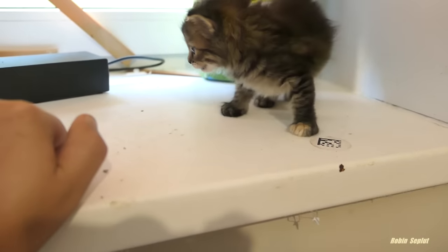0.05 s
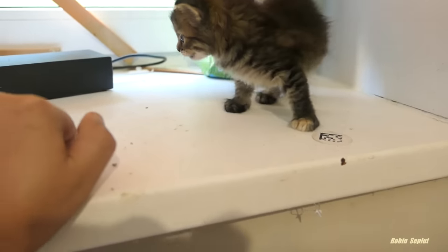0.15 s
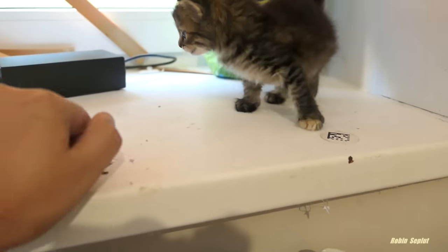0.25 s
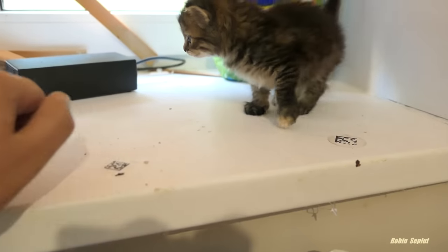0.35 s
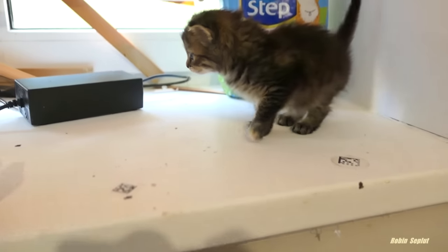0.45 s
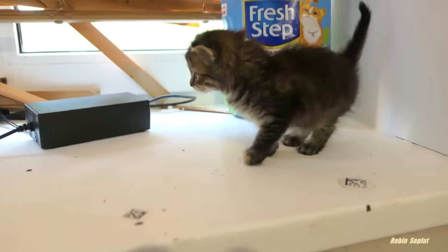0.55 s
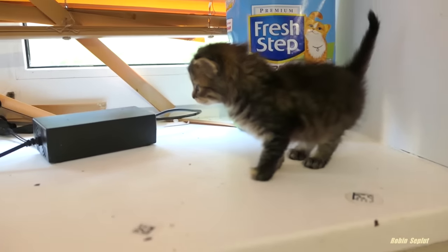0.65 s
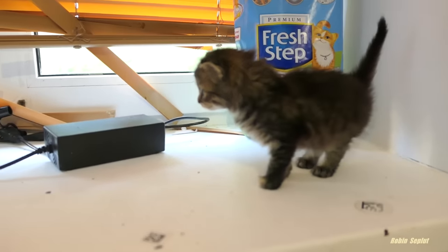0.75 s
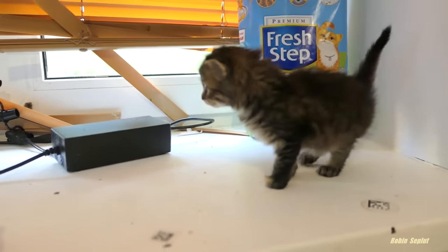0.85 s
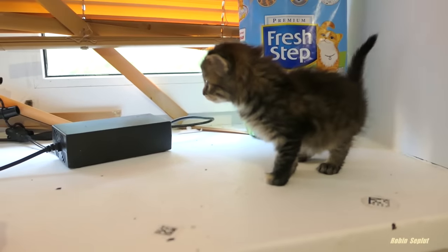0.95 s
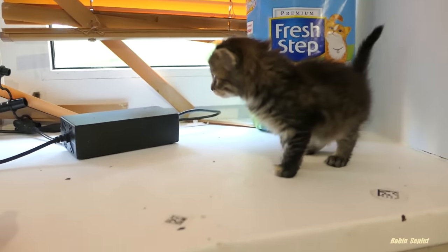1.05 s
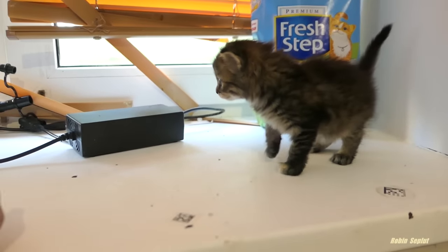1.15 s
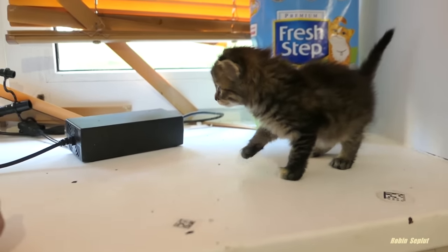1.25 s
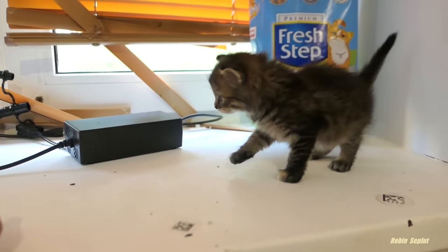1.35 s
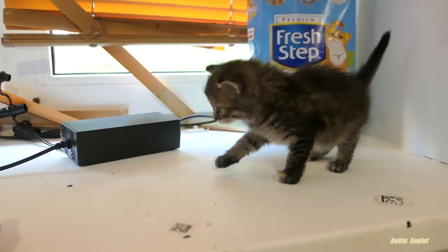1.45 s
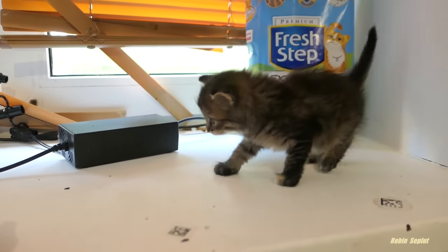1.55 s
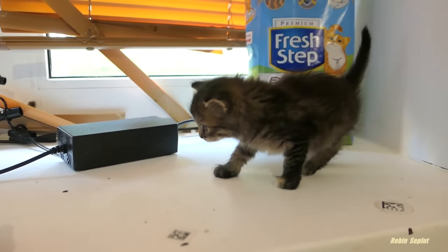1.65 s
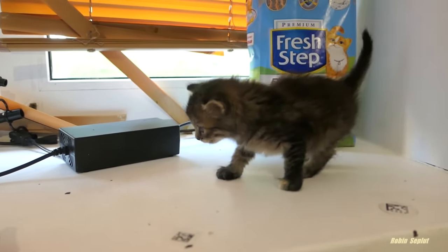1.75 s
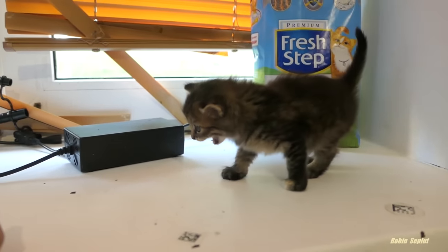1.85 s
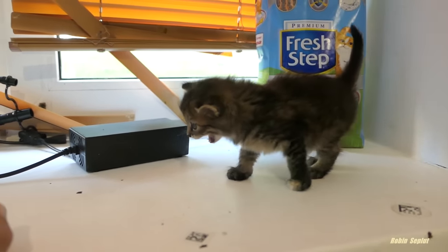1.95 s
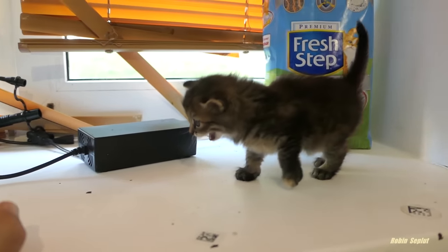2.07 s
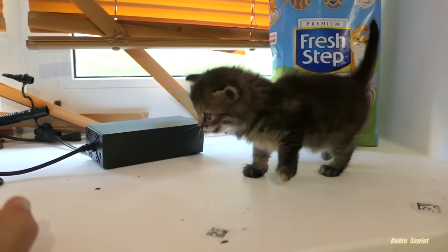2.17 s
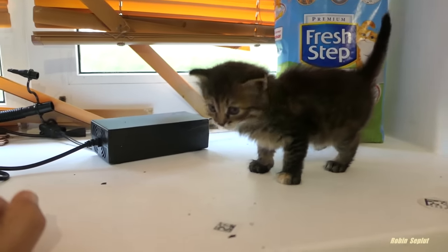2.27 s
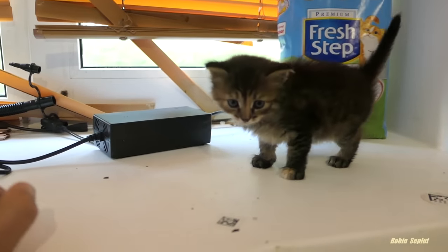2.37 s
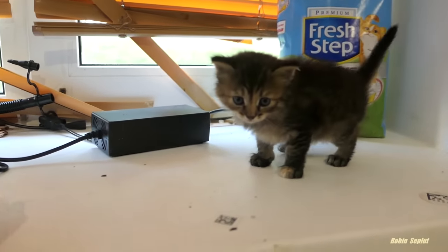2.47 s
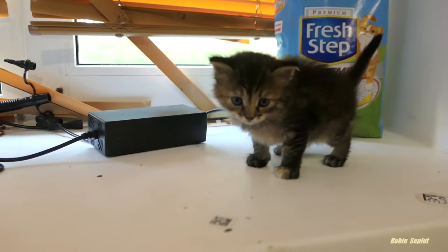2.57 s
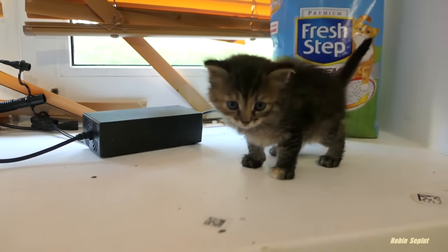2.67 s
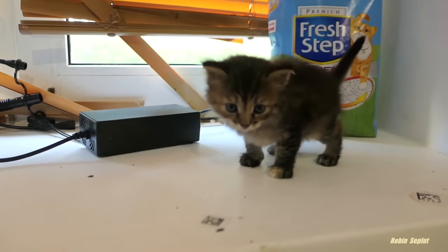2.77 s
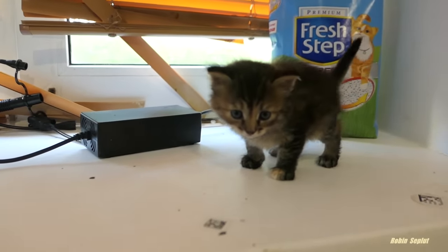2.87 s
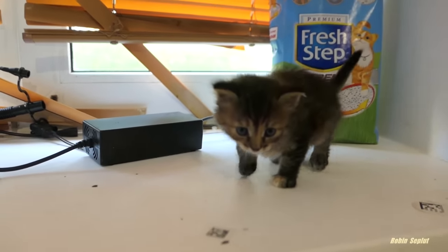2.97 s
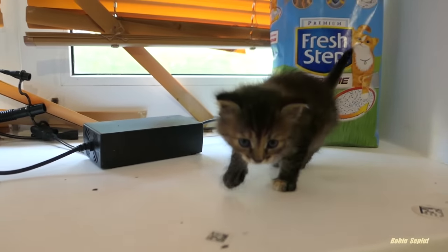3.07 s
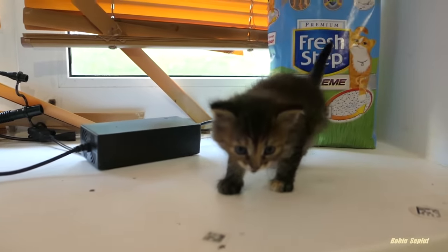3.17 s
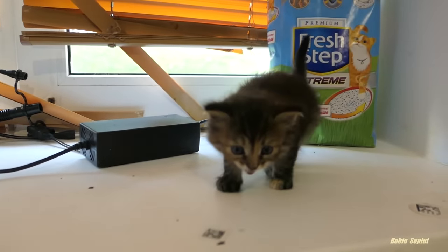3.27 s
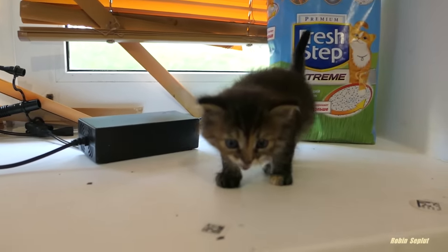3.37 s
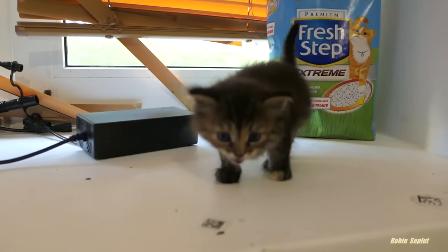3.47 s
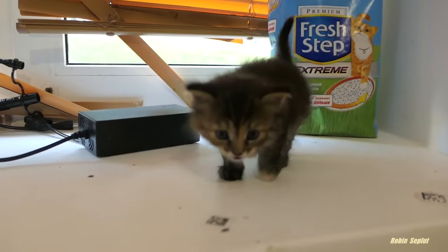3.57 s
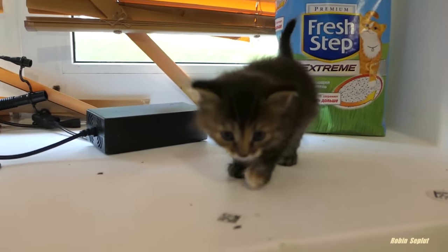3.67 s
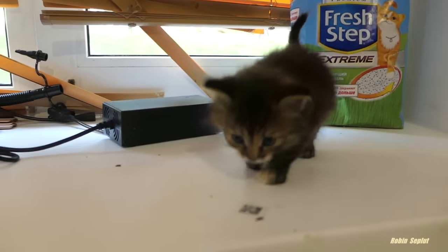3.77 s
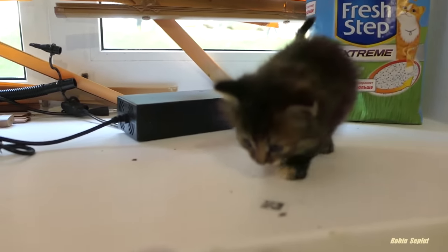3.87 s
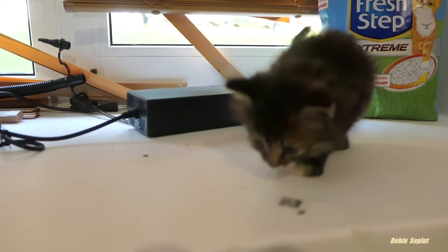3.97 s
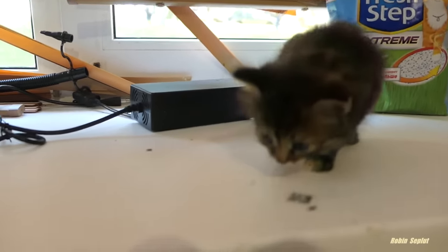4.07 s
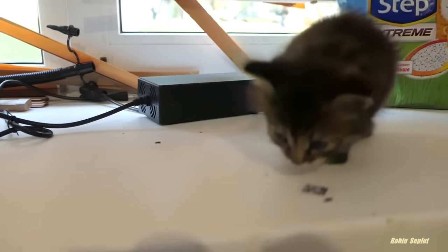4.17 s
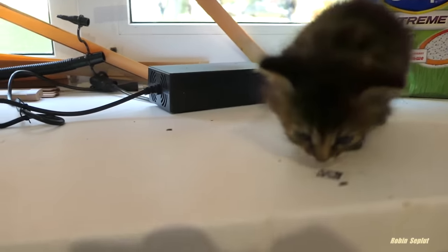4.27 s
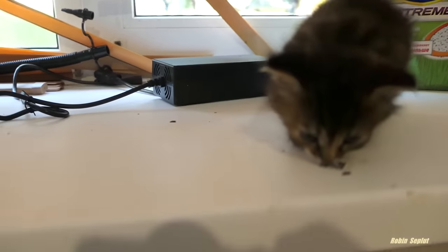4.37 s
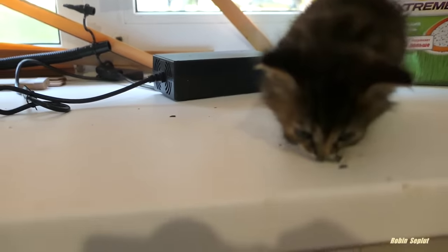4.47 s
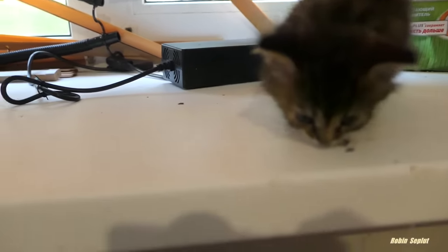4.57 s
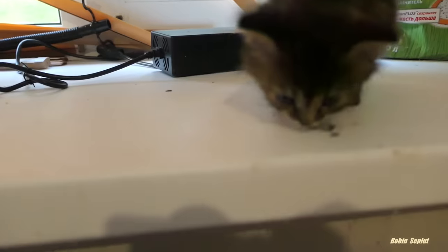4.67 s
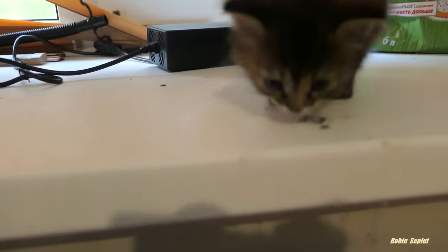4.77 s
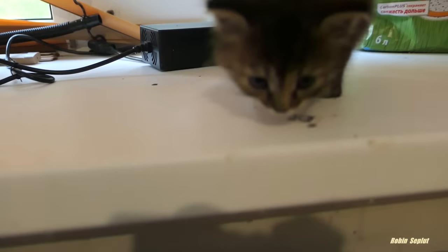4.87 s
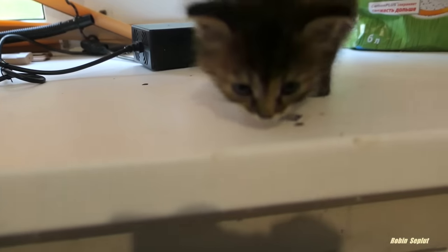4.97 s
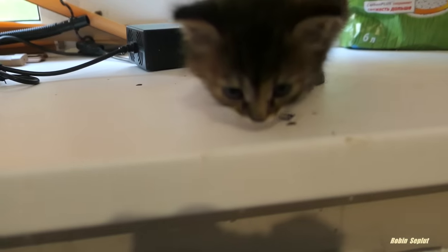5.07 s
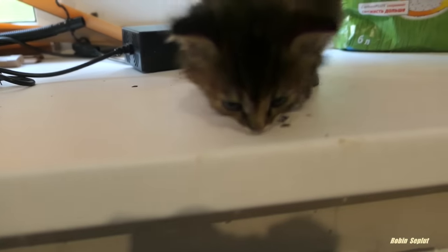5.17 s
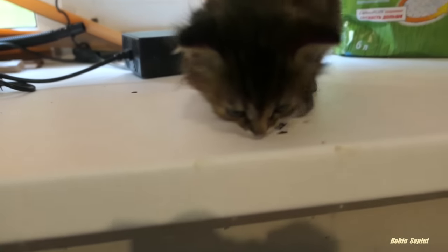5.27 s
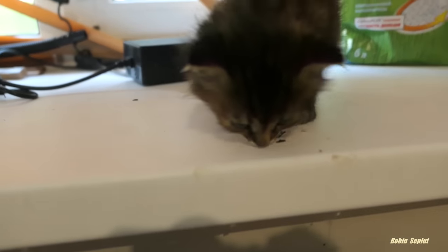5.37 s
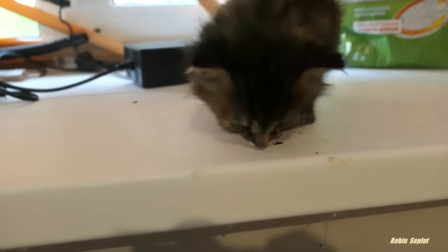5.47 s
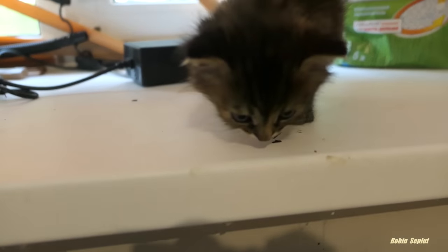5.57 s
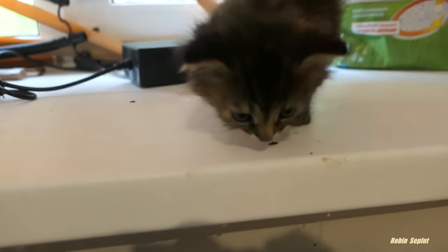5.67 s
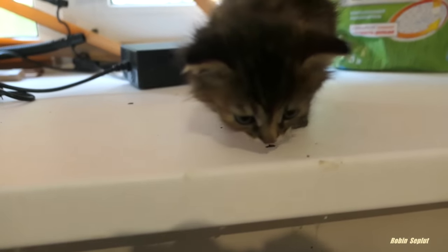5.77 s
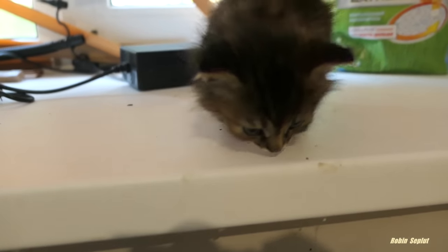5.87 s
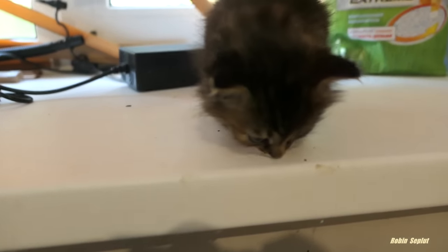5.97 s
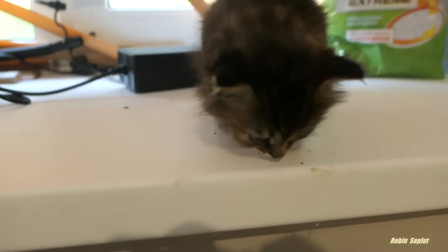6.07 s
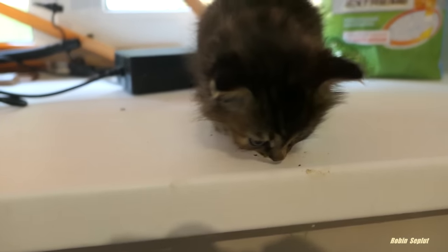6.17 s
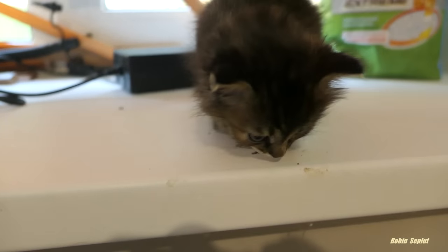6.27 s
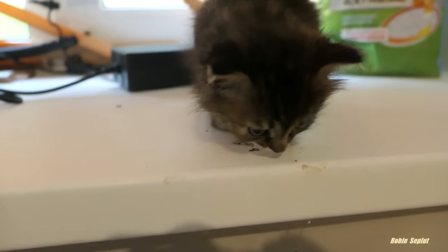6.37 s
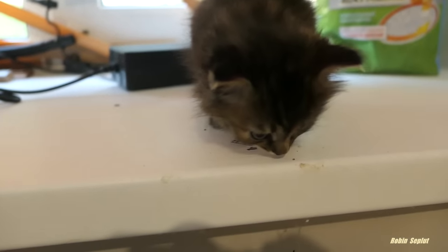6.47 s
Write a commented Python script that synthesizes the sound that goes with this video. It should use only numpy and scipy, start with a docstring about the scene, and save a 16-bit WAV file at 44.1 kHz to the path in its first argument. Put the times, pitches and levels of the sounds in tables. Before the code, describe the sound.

Something heavy and wooden slides briefly, then bangs loudly with a short rattle and a ringing echo. A young kitten close to the microphone follows with four thin, raspy, high mews, one just a tiny squeak. A softer wooden bump comes after the first mew. Paws and mouth add small ticks and scuffs over quiet room air, low hiss, a faint hum and a soft rustle.

```python
"""A young kitten on an indoor window sill gives four thin, raspy, high mews close by.
Its vocal folds buzz unevenly, and its tiny throat shapes that buzz and a hiss of breath into each mew.
Paws and mouth add small ticks and scuffs. Early on, something heavy and wooden slides and bangs with a
short rattle; later comes a softer bump. Behind it all are quiet room air, low microphone hiss, a faint
hum, a soft rustle and, near the end, a low rumble from handling the microphone."""
import sys
import numpy as np
from scipy import signal
from scipy.fft import rfft, irfft
from scipy.io import wavfile
from scipy.ndimage import uniform_filter1d

SR = 44100
rng = np.random.default_rng(int(sys.argv[2]) if len(sys.argv) > 2 else 0)


def output_pcm(signal):
    """Save a mono or channel-first signal as 16-bit PCM at the path in sys.argv[1].

    Samples are clipped to [-1, 1] before scaling.
    """
    pcm = np.clip(np.atleast_2d(signal).T, -1, 1) * 32767
    wavfile.write(sys.argv[1], SR, np.round(pcm).astype(np.int16))


N = 287734


def amp(db):
    """Turns decibels into a number to multiply a sound by."""
    return 10 ** (np.asarray(db) / 20)


def unit(x):
    """Scales a signal so that its average strength (rms) is 1."""
    return x / np.sqrt(np.mean(x ** 2) + 1e-20)


def read(points, hz):
    """Looks up a value between a table's rows, spacing frequencies by octaves."""
    row_hz, value = np.transpose(points)
    return np.interp(np.log(hz + 1), np.log(row_hz + 1), value)


def add(mix, start_s, sound):
    """Adds a sound to the mix at its start time."""
    part = mix[max(round(start_s * SR), 0):][:len(sound)]
    part += sound[:len(part)]


def bins(x):
    """Lists the frequencies in the spectrum of x."""
    return np.fft.rfftfreq(x.shape[-1], 1 / SR)


def colour(x, points):
    """Turns frequencies up or down by a table of frequency_hz, gain_db."""
    return irfft(rfft(x) * amp(read(points, bins(x))), x.shape[-1])


def band(x, hz, width_hz):
    """Keeps the sound near one pitch, as a resonance does, at strength 1."""
    return unit(irfft(rfft(x) / (1 + ((bins(x) - hz) / width_hz * 2) ** 2), x.shape[-1]))


def wobble(size, hz):
    """A random wavering of strength 1, mostly slower than hz."""
    noise = rng.standard_normal(size)
    return unit(irfft(rfft(noise) / (1 + (bins(noise) / hz) ** 2), size))


def swells(rows, rise_s):
    """A loudness curve of smooth humps, each with its own peak and fade."""
    t = np.arange(N) / SR
    power = np.zeros(N)
    for peak_s, level_db, fade_s in rows:
        width_s = np.where(t < peak_s, rise_s, fade_s)
        power += (amp(level_db) * np.exp(-((t - peak_s) / width_s) ** 2 / 2)) ** 2
    return np.sqrt(power)


def sharp_pulse(points, size=4096):
    """The most sudden pulse that has the given tone colour, with energy 1."""
    log_gain = np.log(amp(read(points, abs(np.fft.fftfreq(size, 1 / SR)))))
    pulse = np.fft.ifft(np.exp(np.conj(signal.hilbert(log_gain)))).real
    return pulse / np.linalg.norm(pulse)


def pan(left_db):
    """Two gains that make the left side louder than the right by left_db."""
    return amp([[left_db / 2], [-left_db / 2]])


def pair(x, likeness):
    """Makes two unrelated noises partly alike, as two nearby microphones hear a room."""
    first, second = rfft(x)
    alike = np.clip(read(likeness, bins(x)), 0, 1)
    shared = np.sqrt((1 + alike) / 2) * first
    opposite = np.sqrt((1 - alike) / 2) * second
    return irfft(np.array([shared + opposite, shared - opposite]), x.shape[-1])


# How long the room's echo takes to fade by 60 dB: frequency_hz, fade_s
ECHO_FADE = [(150, 0.62), (500, 0.67), (1500, 0.76), (3500, 0.69), (6000, 0.7445), (10000, 0.38),
             (15000, 0.42)]
# The tone colour of that echo: frequency_hz, gain_db
ECHO_COLOUR = [(150, 5.5), (1000, -1.5), (2200, 3), (3300, -5.5), (4500, 2), (6000, -4), (9000, -2),
               (15000, -5.5)]
# How alike it is on the left and right: frequency_hz, likeness_0_to_1
ECHO_LIKENESS = [(100, 1), (400, 0.94), (1000, 0.78), (3000, 0.83), (10000, 0.9)]

def room(x, gap_s):
    """After a short gap, the walls return a wash of echoes; each frequency fades at its own speed."""
    noise = pair(rng.standard_normal((2, SR)), ECHO_LIKENESS)
    hz, t, spectrum = signal.stft(noise, SR, nperseg=512)
    gain_db = read(ECHO_COLOUR, hz)[:, None] - 60 * t / read(ECHO_FADE, hz)[:, None]
    tail = signal.istft(spectrum * amp(gain_db), SR, nperseg=512)[1]
    tail *= np.clip(np.arange(tail.shape[1]) / SR / gap_s - 1, 0, 1)
    return signal.fftconvolve(x[None], tail / np.linalg.norm(tail[0]), axes=1)[:, :N]


# The tone colour of the room's quiet air: frequency_hz, gain_db
ROOM_AIR = [(25, -35), (60, -11.5), (105, -11), (135, -2.5), (230, 1), (420, -4.5), (560, -6), (710, -18),
            (1000, -16), (1300, -14), (2300, -18), (4600, -22.5), (5400, -16.5), (10000, -19.5),
            (15500, -27.5)]
# The tone colour of the microphone's own hiss: frequency_hz, gain_db
MICROPHONE_HISS = [(15, -57), (25, -29), (64, -13.5), (193, 1), (433, -1.5), (631, -4), (722, -7),
                   (804, -5.5), (919, -7), (1800, -15), (2700, -26.5), (15500, -36.5)]
# Humming bands of noise: pitch_hz, width_hz, level_db
HUM_BANDS = [(170, 43, -78.5), (494, 12, -79), (622, 60, -70.5), (814, 75, -64)]

def steady_noise(air_db=-62.5, hiss_db=-53):
    """Wide, low microphone hiss, opposite on the two sides, over quiet room air and a hum to the left."""
    air_noise, hiss_noise, hum_noise = rng.standard_normal((3, N))
    air = amp(air_db) * unit(colour(air_noise, ROOM_AIR))
    hiss = amp(hiss_db) * unit(colour(hiss_noise, MICROPHONE_HISS)) * np.array([[1], [-1]])
    hum = sum(amp(db) * band(hum_noise, hz, width_hz) for hz, width_hz, db in HUM_BANDS)
    return pan(0.26) * air + hiss + pan(14.1) * hum


# The tone colour of the rustle: frequency_hz, gain_db
RUSTLE_TONE = [(100, -17), (300, -6), (500, 7), (800, -9.5), (1300, 8), (1600, -2.5), (1850, -0.5),
               (2300, -17), (6000, -21), (15000, -33)]
# When it swells: peak_s, level_db, fade_s
RUSTLE_SWELLS = [(0.03, -59, 0.2), (0.31, -60, 0.092), (1.07, -55.5, 0.13), (1.85, -58.5, 0.8),
                 (2.27, -58.5, 0.21), (3.3, -59.5, 0.59), (3.75, -60, 0.26), (4.28, -56, 0.23),
                 (6.32, -58, 0.2)]

def rustle(rest_db=-65.5, flicker_db=3.14, waver_db=1.4):
    """A soft rustle swells now and then, while small patches of its tone flicker."""
    noise = colour(rng.standard_normal(N), RUSTLE_TONE)
    spectrum = signal.stft(noise, SR, nperseg=512)[2]
    patches = uniform_filter1d(rng.standard_normal(spectrum.shape), size=3, axis=0)  # blur in pitch
    patches = unit(uniform_filter1d(patches, size=7, axis=1))  # blur in time
    flickering = unit(signal.istft(spectrum * amp(flicker_db * patches), SR, nperseg=512)[1][:N])
    level = np.hypot(amp(rest_db), swells(RUSTLE_SWELLS, rise_s=0.11))
    level *= amp(waver_db * wobble(N, 21))
    return pan(3.9) * level * flickering


# The swell of the handling rumble: peak_s, level_db, fade_s
RUMBLE_SWELL = [(5.85, -66, 0.43)]

def handling_rumble(rest_db=-81):
    """A soft, low rumble grows as a hand moves the microphone closer."""
    level = np.hypot(amp(rest_db), swells(RUMBLE_SWELL, rise_s=0.67))
    return level * band(rng.standard_normal(N), hz=147, width_hz=51)


# The two slips of the sliding wood: peak_s, level_db, fade_s
WOOD_SLIPS = [(0.345, -53.5, 0.016), (0.392, -53.5, 0.033)]

def wood_slide(room_db=-13.5):
    """Rubbing makes heavy wood groan at one low pitch."""
    rub = band(rng.standard_normal(N), hz=299, width_hz=48)
    stick_slip = unit(np.tanh(2 * rub))  # sticking and slipping evens the swing and adds overtones
    groan = swells(WOOD_SLIPS, rise_s=0.016) * stick_slip
    return pan(1.5) * (groan + amp(room_db) * room(groan, gap_s=0.0046))


# The notes the wood rings with, each fading by 60 dB: pitch_hz, relative_level_db, fade_s
WOOD_NOTES = [(178, -7, 0.35), (181.2, 2.5, 0.85), (203, -29, 0.78), (240, -14, 0.71), (294, -8, 0.98),
              (375.6, -4.5, 1), (445, 0.5, 0.46), (487, 8, 0.45), (571, 8, 0.78), (829, -1.5, 0.78),
              (892, 4, 1), (893, -3, 0.34)]
# The tone colour of a thud: frequency_hz, gain_db
THUD_COLOUR = [(40, -66), (90, -29.5), (160, -2.5), (260, -2.5), (400, -1), (580, 6), (700, -6.5), (930, 1),
               (1100, -12), (1800, -24), (2700, -40), (4500, -60), (6500, -44), (15000, -78)]
# Blows, bunched into a bang and a bump: start_s, strength_db, dulling_db_per_octave (above 500 Hz)
WOOD_BLOWS = [(0.6213, -4.5, -2), (0.625, 7.5, 4), (0.6278, 12.5, 0), (0.6330, -3, 1), (2.8172, -19, -4.5),
              (2.8191, -10.5, 0.5), (2.8253, -21, 7)]

def wood_bangs(ring_db=-4.0, room_db=-1.5, bass_cut_hz=124):
    """Each blow on a wooden panel thuds, sets the wood ringing and echoes round the room."""
    thuds, rings = np.zeros((2, N))
    t = np.arange(SR) / SR
    ring = sum(amp(db - 60 * t / fade_s) * np.sin(2 * np.pi * (hz * t + rng.random()))
               for hz, db, fade_s in WOOD_NOTES)
    ring *= 1 - np.exp(-t / 0.0025)
    for start_s, strength_db, dulling in WOOD_BLOWS:
        tone = [(hz, db - dulling * np.clip(np.log2(hz / 500), 0, 3)) for hz, db in THUD_COLOUR]
        add(thuds, start_s, amp(strength_db) * sharp_pulse(tone))
        add(rings, start_s, amp(strength_db) * ring / np.linalg.norm(ring))
    # the thuds and rings carry little deep bass
    bass_cut = signal.butter(4, bass_cut_hz, "high", fs=SR, output="sos")
    thuds, rings = signal.sosfilt(bass_cut, [thuds, rings])
    return pan(1.5) * (thuds + amp(ring_db) * rings + amp(room_db) * room(thuds, gap_s=0.0034))


# Echoes off the sill, side wall and pane: delay_s, gain_db, extra_delay_on_right_s
WINDOW_ECHOES = [(0.0006, -25.5, 0.00001), (0.0021, -11, 0.0038), (0.0038, -23, -0.0061),
                 (0.0075, -18, -0.00002), (0.0132, -16, 0.00004)]

def alcove(x):
    """The window alcove adds a few quick echoes, timed a little differently on each side."""
    left, right = x.copy(), x.copy()
    for delay_s, gain_db, extra_s in WINDOW_ECHOES:
        add(left, delay_s, amp(gain_db) * x)
        add(right, delay_s + extra_s, amp(gain_db) * x)
    return np.array([left, right])


# The tone colours of a tick and of the low knock under it: frequency_hz, gain_db
TICK_COLOUR = [(500, 2.5), (2500, 3), (5500, -1.5), (8500, -3), (10500, 0), (15000, -18)]
KNOCK_COLOUR = [(40, -43), (100, -21), (250, -4), (600, 5.5), (1500, -4), (2300, -21), (5000, -48),
                (9000, -60)]
# Ticks, scuffs and (at 0.6232 s) the wood's rattle: start_s, relative_tick_db, fade_s, relative_knock_db
TICK_EVENTS = [(0.3029, -55.5, .012, -49), (0.3159, -56.5, 0.015, -39.5), (0.6232, -45, 0.0044, -37),
               (1.83, -57, 0.011, -67), (2.285, -60, 0.043, -64), (2.4495, -56.5, 0.0073, -45),
               (2.505, -60.5, 0.043, -46), (3.6893, -58.5, 0.015, -68), (4.6952, -70, .006, -46),
               (5.1244, -71, .006, -50.5), (5.358, -64.5, .025, -58), (5.479, -77, .006, -50),
               (5.9004, -40, 0.0014, -57), (5.9053, -40.5, 0.0011, -50), (5.9185, -49.5, 0.01, -64)]

def ticks(tick_boost_db=2):
    """Small ticks and scuffs from the kitten, plus a short rattle as the wood bangs."""
    out = np.zeros(N)
    t = np.arange(8192) / SR
    for start_s, tick_db, fade_s, knock_db in TICK_EVENTS:
        tick_noise, knock_noise = rng.standard_normal((2, len(t)))
        rise = 1 - np.exp(-5 * t / fade_s)  # long scuffs also start softly
        tick = unit(colour(tick_noise, TICK_COLOUR)) * rise * np.exp(-t / fade_s)
        add(out, start_s, amp(tick_db + tick_boost_db) * tick)
        push = knock_noise * (1 - np.exp(-t / 0.0026)) * np.exp(-t / 0.0081)
        add(out, start_s, amp(knock_db) * signal.fftconvolve(push, sharp_pulse(KNOCK_COLOUR)))
    return out


# How the kitten's tiny throat colours sound: frequency_hz, gain_db
THROAT_COLOUR = [(600, -38), (1080, -1), (2200, -18.5), (2650, -8.5), (3100, -6), (3500, 0), (3900, -16.5),
                 (4300, -8.5), (5500, -1.5), (6700, -3), (7500, -9), (8500, -18.5), (10400, -17),
                 (15500, -32.5)]

def voice(cycles, pitch_hz, rough, first_db, third_db, bright_db, throat_scale, piercing_db):
    """The vocal folds make harmonics (whole multiples of the pitch); the throat sets each one's level."""
    size = len(cycles)
    out = np.zeros(size)
    for k in range(1, 16):
        lookup_hz = k * pitch_hz / (throat_scale if k > 3 else 1)  # shifts the throat's upper peaks
        gain_db = read(THROAT_COLOUR, lookup_hz) + first_db * (k == 1) + third_db * (k == 3)
        gain_db += bright_db * np.clip((lookup_hz - 7500) / 1500, 0, 1)
        if k == 2 or 3 < k < 9:  # a tight mouth lifts a piercing peak over its neighbours
            gain_db += piercing_db * (np.exp(-((lookup_hz - 6200) / 1000) ** 4) - 0.7)
        # high harmonics drift and flicker most as the head moves
        unsteadiness = min(k / 6, 1.3)
        drift = amp(2.5 * unsteadiness * wobble(size, 10))
        flicker = 1 + 0.73 * unsteadiness * rough * wobble(size, 200)
        wave = np.sqrt(2) * np.cos(2 * np.pi * k * cycles - np.pi * k ** 2 / 7)
        out += amp(gain_db) * drift * flicker * wave
    return out


# The colour of breath, on top of the throat's own: frequency_hz, gain_db
BREATH_COLOUR = [(700, 11.5), (2600, -14), (3900, -8), (5000, -6), (7000, 5), (10500, 2), (15000, -10)]

def breath(noise):
    """Air forced through the throat hisses."""
    return unit(colour(colour(noise, THROAT_COLOUR), BREATH_COLOUR))


def puff(length_s):
    """A growing hiss of air just before the vocal folds start to buzz."""
    grow = np.linspace(0, 1, round(length_s * SR))
    return np.sqrt(grow) * breath(rng.standard_normal(len(grow)))


def mew(row, pitch_path, swell_db=6.5, jitter=0.0483, trim_db=-3):
    """One mew: strained vocal folds buzz and leak breath while the mouth closes."""
    (start_s, length_s, effort_db, sag_db, rough, first_db, third_db, third_rise_db,
     bright_db, throat_scale, piercing_db) = row
    t = np.arange(0, length_s, 1 / SR)
    size, progress = len(t), t / length_s
    # the mew starts soft, swells, then sags more and more steeply
    level_db = effort_db - swell_db * np.exp(-t / 0.017) + sag_db * progress ** 1.76
    # the folds are rough until they settle, and again as the breath runs out
    rough = rough + 0.51 * np.exp(-t / 0.0092) + 0.44 * np.exp((t - length_s) / 0.024)
    rough = np.clip(rough, 0.05, 1)
    # closing the mouth shifts the tone from the top toward the low harmonics
    closed = (1 + np.tanh((progress - 0.6) / 0.29)) / 2
    first_db = first_db + 4 * closed
    third_db = third_db + third_rise_db * closed
    bright_db = bright_db - 4.5 * closed
    # uneven cycles blur the high harmonics into a hiss
    shake = jitter * rough * wobble(size, 300)
    flutter = 0.0055 * wobble(size, 63) + 0.0043 * wobble(size, 400)
    pitch_hz = np.interp(start_s + t, *np.transpose(pitch_path)) * (1 + shake + flutter)
    cycles = np.cumsum(pitch_hz) / SR
    tone = voice(cycles, pitch_hz, rough, first_db, third_db, bright_db, throat_scale, piercing_db)
    airflow = 1 + 0.22 * np.cos(2 * np.pi * cycles)  # more air escapes each time the folds open
    rasp = rough * breath(airflow * rng.standard_normal(size))
    fades = np.clip(t / 0.0032, 0, 1) * np.clip((length_s - t) / 0.017, 0, 1)
    return amp(level_db + trim_db) * fades * (tone + rasp)


# The pitch path of each mew: time_s, pitch_hz
RISING_MEW = [(1.878, 1084), (1.894, 1069), (1.912, 1113), (2.05, 1193), (2.064, 1228), (2.085, 1190)]
FLAT_MEW = [(3.243, 1138), (3.251, 1131), (3.263, 1094), (3.277, 1076), (3.369, 1073), (3.381, 1120),
            (3.391, 1122), (3.44, 1085)]
SHORT_SQUEAK = [(3.587, 1095), (3.613, 1163), (3.624, 1175)]
WAVERING_MEW = [(5.646, 1034), (5.666, 1045), (5.68, 1000), (5.692, 1047), (5.738, 1128), (5.766, 1056),
                (5.78, 1099), (5.798, 1084), (5.818, 1116)]
# The four mews: start_s, length_s, effort_db, sag_db, roughness_0_to_1, first_harmonic_db,
# third_harmonic_db, third_rise_db (as the mouth closes), brightness_db, throat_scale, piercing_db
KITTEN_MEWS = [(1.875, 0.22, -32, -11, 0.13, -11.5, -19, 24, 2, 1.004, 6),
               (3.238, 0.21, -36, -4, 0.24, -10, -9.5, 1.5, 3, 1.047, -2.5),
               (3.585, 0.041, -45.5, -1.5, 0.13, 10, 7, -1, 2, 1.0, 0),
               (5.642, 0.18, -32, -10, 0.21, -7.5, -3, 10.5, 0.5, 1.04, 3)]

def kitten_and_ticks(puff_s=0.04, puff_db=-23.5, room_db=-4, room_db_per_s=-0.62):
    """Mews, ticks and the wood's rattle; their echo shrinks as the kitten walks toward the microphone."""
    close = np.zeros(N)
    for row, pitch_path in zip(KITTEN_MEWS, (RISING_MEW, FLAT_MEW, SHORT_SQUEAK, WAVERING_MEW)):
        start_s, _, effort_db = row[:3]
        add(close, start_s - puff_s, amp(effort_db + puff_db) * puff(puff_s))
        add(close, start_s, mew(row, pitch_path))
    close += ticks()
    room_share = amp(room_db + room_db_per_s * np.arange(N) / SR)
    return pan(0.16) * (alcove(close) + room(room_share * close, gap_s=0.0043))


def scene():
    """Mixes the kitten, the wood and the quiet background in stereo."""
    return kitten_and_ticks() + wood_bangs() + wood_slide() + steady_noise() + rustle() + handling_rumble()


def record(dry):
    """Cuts away the very highest treble, above 15750 Hz."""
    treble_cut = signal.firwin(511, 15750, window=("kaiser", 9), fs=SR)
    return signal.oaconvolve(dry, treble_cut[None], "same")


dry = scene()
out = record(dry)
output_pcm(out)
```